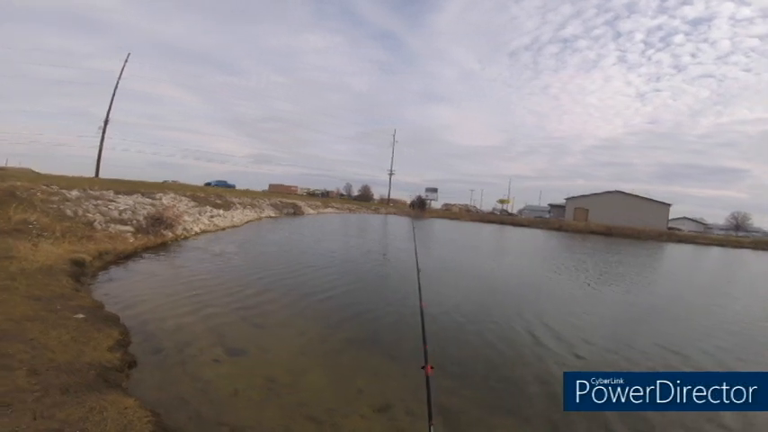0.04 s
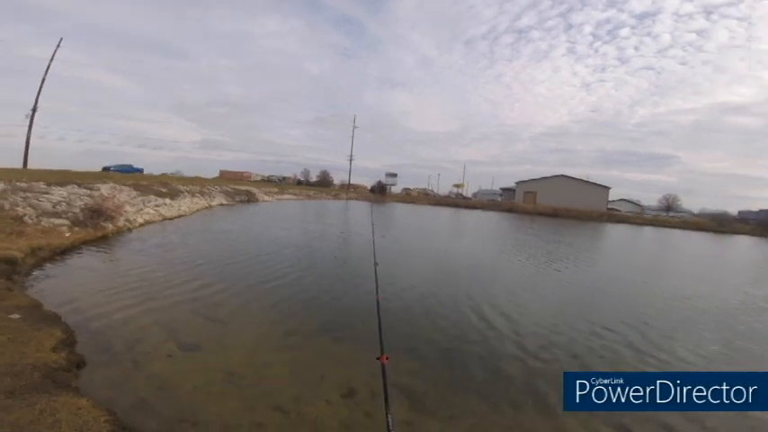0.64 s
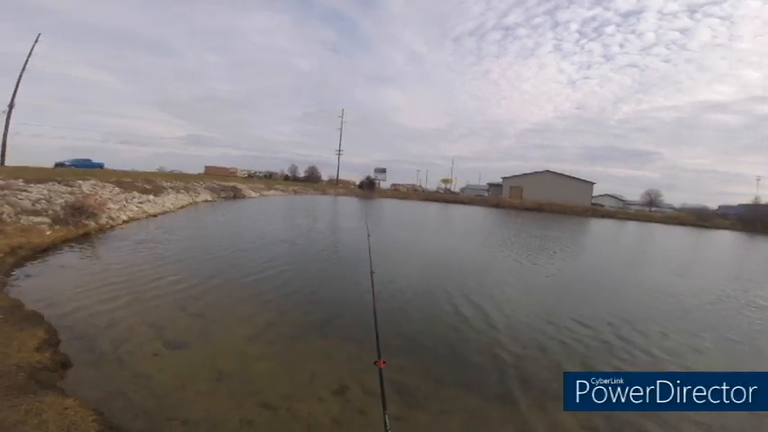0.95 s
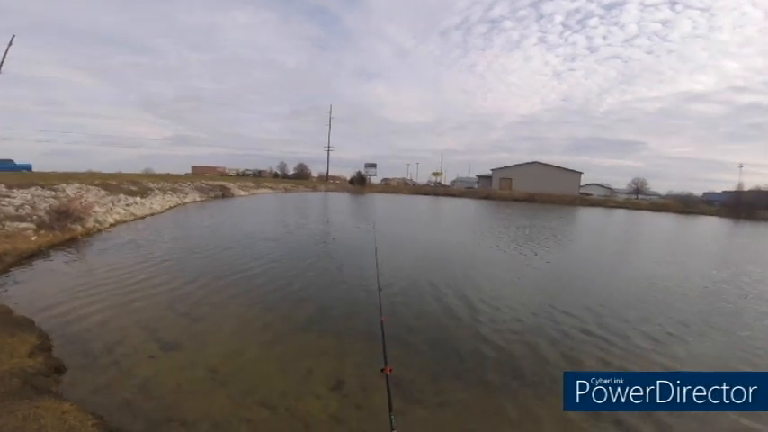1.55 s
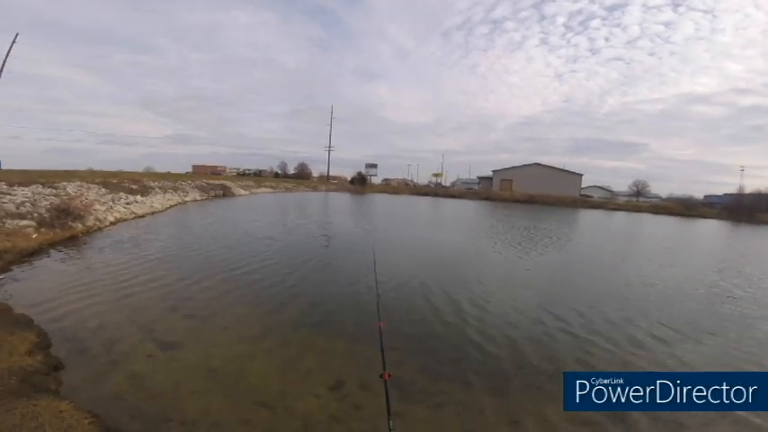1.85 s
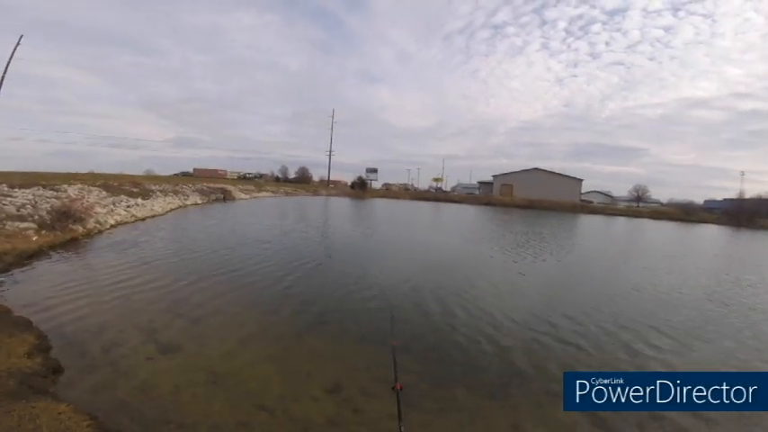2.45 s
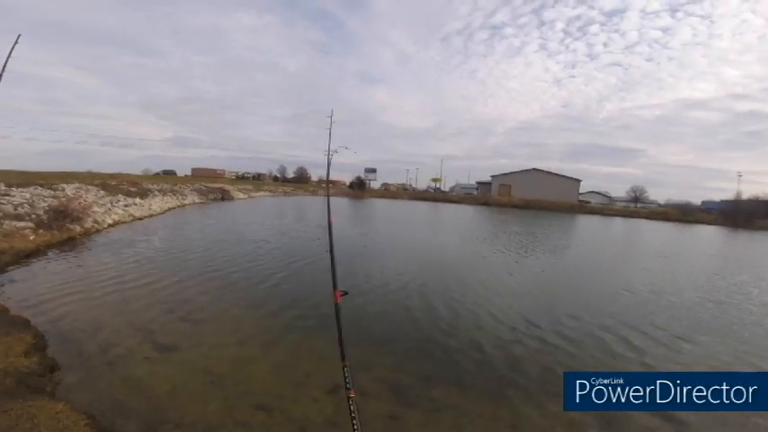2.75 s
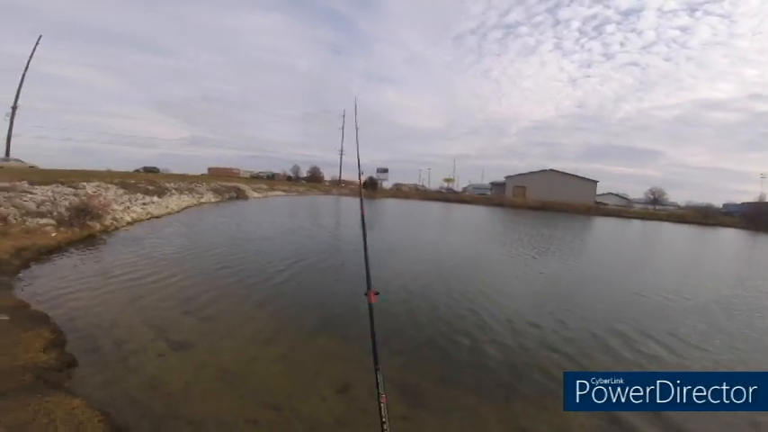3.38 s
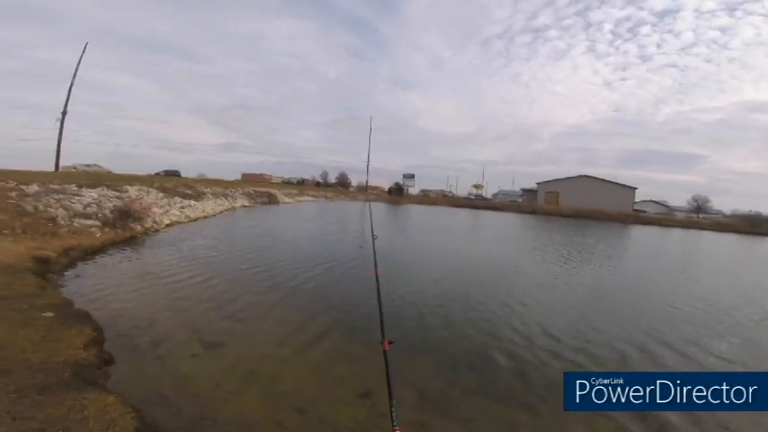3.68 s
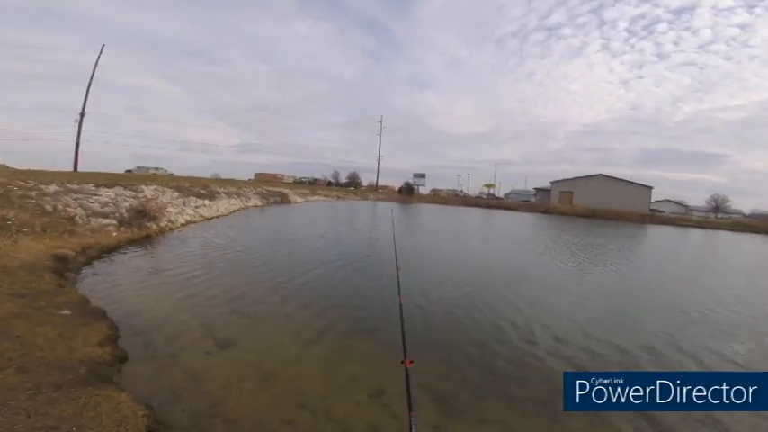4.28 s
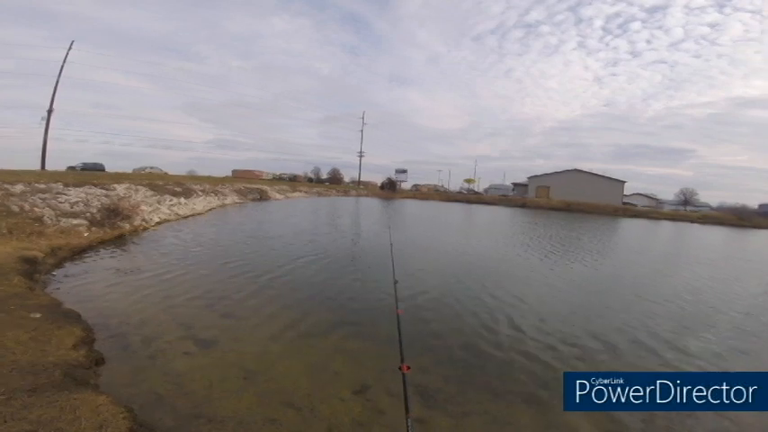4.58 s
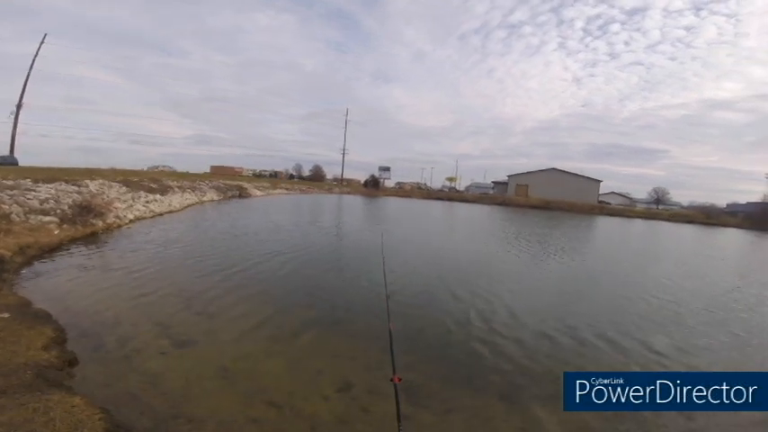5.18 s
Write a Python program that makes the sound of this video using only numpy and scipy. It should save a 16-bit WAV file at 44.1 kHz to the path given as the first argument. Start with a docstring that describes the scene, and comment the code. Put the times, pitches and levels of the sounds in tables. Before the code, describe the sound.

Wind rumbles on the microphone beside a pond while a goose honks a few times and a distant engine drones.

```python
"""On the bank of a pond, wind rumbles against a small microphone, over the wash of open air.
A far-off engine picks up speed, its exhaust throbbing above a low drone and a deep hum.
A goose some way off honks three times, hoarse while its voice box catches, then ringing clear,
and the banks send the sound back. Another goose calls faintly from farther away.
Something ticks once before the first honk, and the microphone hisses throughout."""
import sys
import numpy as np
from scipy import signal
from scipy.fft import rfft, irfft, next_fast_len
from scipy.io import wavfile
from scipy.ndimage import uniform_filter1d, map_coordinates

SR = 44100
rng = np.random.default_rng(int(sys.argv[2]) if len(sys.argv) > 2 else 0)


def master(y):
    """Save y as 16-bit WAV."""
    cut = np.clip(np.atleast_2d(y).T, -1, 1)
    pcm = np.round(cut * 32767)  # scale
    wavfile.write(sys.argv[1], SR, pcm.astype(np.int16))


N = 234744


def amp(db):
    """Turn decibels into a number to multiply a sound by."""
    return 10 ** (np.asarray(db) / 20)


def unit(x):
    """Scale a signal so that its average size (rms) is 1."""
    return x / np.sqrt(np.mean(x ** 2) + 1e-20)


def along(points, hz):
    """Read between (pitch_hz, value) points, giving each octave about equal room."""
    pitches, values = np.transpose(points)
    return np.interp(np.log(hz + 1), np.log(pitches + 1), values)


def curves(rows, at):
    """Look up places in a table's first column; return a curve for each other column."""
    places, *columns = np.transpose(rows)
    return [np.interp(at, places, column) for column in columns]


def wobble(rate):
    """A smooth curve through `rate` random values a second."""
    points = rng.standard_normal(int(N * rate / SR) + 4)
    return map_coordinates(points, [np.arange(N) * rate / SR])


def filtered(x, response):
    """Multiply each frequency in a sound by response(hz)."""
    size = next_fast_len(N + SR // 2)
    hz = np.fft.rfftfreq(size, 1 / SR)
    return irfft(rfft(x, size) * response(hz), size)[:N]


def noise(colour):
    """Noise of average size 1; (pitch_hz, relative_db) points balance its lows and highs."""
    return unit(filtered(rng.standard_normal(N), lambda hz: amp(along(colour, hz))))


def steadied(x, span_s, share):
    """Even out a share of a noise's own swells that are slower than span_s."""
    power = np.abs(uniform_filter1d(x ** 2, int(span_s * SR))) + 1e-9
    return unit(x / power ** (share / 2))


def wind(breeze_db=-38.5, ease_db_per_s=0.8, flutter_db=0.8):
    """Air swirls at the microphone's opening: a low rumble from an easing breeze and short gusts."""
    # gusts that rise out of the breeze: peak_s, length_s, level_db
    gusts = [(0.049, 0.11, -31), (0.182, 0.051, -27), (0.738, 0.1, -36), (1.536, 0.19, -32.5),
             (1.716, 0.18, -32.5), (1.864, 0.073, -33), (2.444, 0.1, -34)]
    # the tone of the rumble: pitch_hz, relative_db
    rumble = [(6, -23), (17, -3.5), (45, 3.5), (80, 1), (110, -3), (150, -10.5), (220, -20.5), (400, -30),
              (1000, -78)]
    t = np.arange(N) / SR
    power = amp(breeze_db - ease_db_per_s * t + flutter_db * wobble(12)) ** 2
    for peak_s, length_s, level_db in gusts:
        swell = np.cos(np.pi * np.clip((t - peak_s) / length_s, -.5, .5))
        power += (amp(level_db) * swell) ** 2
    return np.sqrt(power) * steadied(noise(rumble), span_s=0.071, share=0.4)


def engine(fading_db=2.0):
    """A far engine speeds up; each exhaust tone fades in and out on its way through moving air."""
    # how the engine runs: time_s, firing_rate_hz, gain_db
    run = [(0, 29.5, -49), (1.3, 28.5, -49), (2.15, 29.2, -56), (2.5, 30.8, -48.5), (2.85, 31.2, -48),
           (3.2, 33.5, -48), (3.75, 35.6, -46), (4.15, 35.8, -45.5), (5.32, 35.3, -45.5)]
    # the exhaust's tones: multiple_of_firing_rate, relative_db
    exhaust = [(1, -6), (2, 0), (3, -6), (4, -1), (5, -4.5), (6, -1), (7, -9), (8, -12)]
    # what the distance leaves of each pitch: pitch_hz, gain_db
    carry = [(28, -6), (37, 0), (60, -6), (72, 2), (110, -3), (142, -2), (174, 0), (190, -6), (210, -16),
             (250, -7), (320, -12)]
    firing_hz, gain_db = curves(run, np.arange(N) / SR)
    phase = 2 * np.pi * np.cumsum(firing_hz) / SR
    tones = 0
    for multiple, relative_db in exhaust:
        strength = amp(relative_db + along(carry, multiple * firing_hz) + fading_db * wobble(3.1))
        tones += strength * np.sin(multiple * phase + .5 * wobble(5))
    return amp(gain_db) * tones


def drone():
    """A low, far-off drone that swells on the breeze, made of narrow, wavering bands of noise."""
    # the drone's bands: pitch_hz, half_width_hz, relative_db
    bands = [(77.2, 13.2, -8.5), (120.5, 33, -4), (181.5, 16, -9), (229, 24, -12), (272.3, 13.2, -16)]
    # how they swell together: time_s, gain_db
    swells = [(0, -48), (1.1, -44), (2.15, -48.5), (2.55, -43.5), (5.32, -43)]
    gain_db, = curves(swells, np.arange(N) / SR)
    sound = 0
    for pitch_hz, half_width_hz, relative_db in bands:
        white = rng.standard_normal(N)
        band = filtered(white, lambda hz: 1 / (1 + ((hz - pitch_hz) / half_width_hz) ** 4))
        sound += amp(relative_db) * steadied(unit(band), span_s=0.27, share=1)
    return amp(gain_db) * sound


def hum(pitch_hz=37.8):
    """A deep tone beneath the engine that wavers a little in strength and pitch."""
    # the hum's rise and fall: time_s, level_db
    swells = [(0, -48), (1.2, -52), (2.1, -49), (2.45, -43.5), (3.6, -44), (4.3, -46), (5.32, -46.5)]
    t = np.arange(N) / SR
    level_db, = curves(swells, t)
    phase = 2 * np.pi * pitch_hz * t + .5 * wobble(4)
    return np.sqrt(2) * amp(level_db + wobble(2.64)) * np.sin(phase)


def air(level_db=-50.5, patchy_db=0.53):
    """Wind washes over water and banks, in drifting patches a little louder or softer."""
    # the tone of the wash: pitch_hz, relative_db
    wash = [(120, -11.5), (250, 1.5), (430, -1.5), (680, 0), (1000, -4), (1500, -9), (2200, -15),
            (3200, -23), (4500, -33.5), (8000, -54)]
    grid = signal.stft(noise(wash), nperseg=512)[2]  # a row per pitch, a column per moment
    patches = uniform_filter1d(rng.standard_normal(grid.shape), size=6, axis=0)
    patches = uniform_filter1d(patches, size=16, axis=1)
    sound = signal.istft(grid * amp(patchy_db * unit(patches)), nperseg=512)[1]
    return amp(level_db) * unit(sound[:N])


def microphone_hiss(level_db=-64.0):
    """The microphone makes a thin, steady hiss of its own."""
    # the tone of the hiss: pitch_hz, relative_db
    colour = [(1500, -19), (4300, -20.5), (5400, -10.5), (6050, -12.5), (6420, 1.5), (6900, -4.5),
              (8200, -9), (9400, -13), (10400, -20.5), (11700, -17), (13200, -21.5), (14500, -36)]
    return amp(level_db) * noise(colour)


def tick():
    """A light, dry touch nearby: a burst of noise that dies at once."""
    # the one tick: start_s, level_db, fade_s (time to fall by 60 dB)
    start_s, level_db, fade_s = (.343, -58, .04)
    # its tone: pitch_hz, relative_db
    colour = [(800, -12), (3000, -5), (5600, 1), (8000, 1), (12000, -26)]
    age_s = np.arange(N) / SR - start_s
    return (age_s > 0) * amp(level_db - 60 * np.abs(age_s) / fade_s) * noise(colour)


def honk(length_s, top_hz, peak_timing, bright_db, nasal_db, edge=0.91, muffle_db=6):
    """One note that rises and falls: hoarse while the voice box catches, brightest at full effort."""
    # how hard the goose pushes: share_of_length, effort_db
    effort = [(0, -10), (.12, -2.5), (.3, .3), (.42, 0), (.56, -1.8), (.72, -4.5), (.87, -7), (1, -11)]
    # the note's shape: share_of_length, share_of_top_pitch, hoarseness (0 to 1)
    arch = [(0, .965, 1), (.2, .976, .8), (.3, .984, .3), (.36, .991, .03), (.54, 1, .02), (.7, .993, .02),
            (.85, .96, .06), (1, .905, .2)]
    # how the throat shapes the voice: pitch_hz, gain_db
    throat = [(350, -24), (710, -8.5), (1420, -3.5), (2150, -18), (2850, -24), (3600, -21.5), (4300, -18.5),
              (5050, -16), (5700, -10.5), (6400, -39), (7300, -27), (9000, -55)]
    n = int(length_s * SR)
    progress = np.linspace(0, 1, n)
    effort_db, = curves(effort, progress)
    pitch_share, hoarse = curves(arch, progress ** peak_timing)  # timing under 1 peaks earlier
    # uneven vibrations smear the high tones into a rasp
    pitch_hz = top_hz * pitch_share * (1 + .07 * hoarse * wobble(1400)[:n])
    phase = 2 * np.pi * np.cumsum(pitch_hz) / SR
    harmonic = np.arange(1, 13)[:, None]  # tones at whole multiples of the pitch
    middle = (harmonic >= 3) & (harmonic <= 6)
    upper = np.clip((harmonic - 2) / 5, 0, 1)
    # the upper tones snap in once the note is clear, and grow with effort
    colour_db = middle * nasal_db + upper * (bright_db + edge * effort_db - muffle_db * hoarse)
    strength = amp(along(throat, harmonic * pitch_hz) + effort_db + colour_db)
    voice = np.sum(strength * np.sin(harmonic * phase), axis=0)
    # while hoarse, strong and weak vibrations take turns and their sizes scatter
    flutter = 1 + .5 * hoarse * (np.sin(phase / 2) + wobble(678)[:n])
    return np.sqrt(2) * voice * flutter * signal.windows.tukey(n, .08)


def geese():
    """One goose honks three times; another, farther off, gives one faint, dull call."""
    # the calls, far goose last: start_s, length_s, top_hz, peak_timing, gain_db, bright_db, nasal_db
    honks = [(1.192, .082, 700, .85, -43.5, -.3, -3.5), (3.012, .092, 728, 1.12, -43, -.2, 1.5),
             (5.217, .094, 736, 1, -42.6, -1.6, 1), (4.27, .10, 680, 1, -54, -18, 0)]
    calls = np.zeros(N + SR)
    for start_s, length_s, top_hz, peak_timing, gain_db, bright_db, nasal_db in honks:
        note = amp(gain_db) * honk(length_s, top_hz, peak_timing, bright_db, nasal_db)
        start = round(start_s * SR)
        calls[start:start + len(note)] += note
    return calls[:N]


def bank_echoes(calls, delay_s=.03, gain_db=-14.5):
    """The banks scatter the calls back over the water as a dull, fading tail."""
    # how long each pitch lingers: pitch_hz, fade_s (time to fall by 60 dB)
    fades = [(500, 1.2), (1400, 1.8), (3000, 0.45), (6000, 0.37)]
    hz, t, grid = signal.stft(rng.standard_normal(SR), SR, nperseg=256)
    fading = amp(-60 * t / along(fades, hz)[:, None])
    tail = signal.istft(grid * fading, SR, nperseg=256)[1]
    delayed = np.pad(calls, (int(delay_s * SR), 0))
    return amp(gain_db) * signal.fftconvolve(delayed, tail / np.linalg.norm(tail))[:N]


def far_shore_echo(calls, delay_s=.15, gain_db=-16, dull_above_hz=2000):
    """The shore across the pond sends back one faint, dull echo."""
    def late_and_dull(hz):
        return np.exp(-2j * np.pi * hz * delay_s) / (1 + (hz / dull_above_hz) ** 4)
    return amp(gain_db) * filtered(calls, late_and_dull)


def scene():
    """Wind, distant machinery, open air and a tick around the geese and their echoes."""
    calls = geese()
    echoes = bank_echoes(calls) + far_shore_echo(calls)
    background = wind() + engine() + drone() + hum() + air()
    return (background + tick() + calls + echoes)[None]


def record(dry, top_hz=14600):
    """The microphone adds its hiss and keeps nothing above top_hz."""
    return filtered(dry[0] + microphone_hiss(), lambda hz: hz < top_hz)[None]


dry = scene()
out = record(dry)
master(out)
```